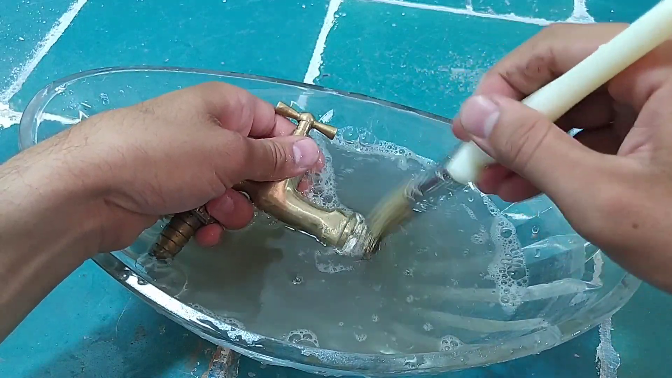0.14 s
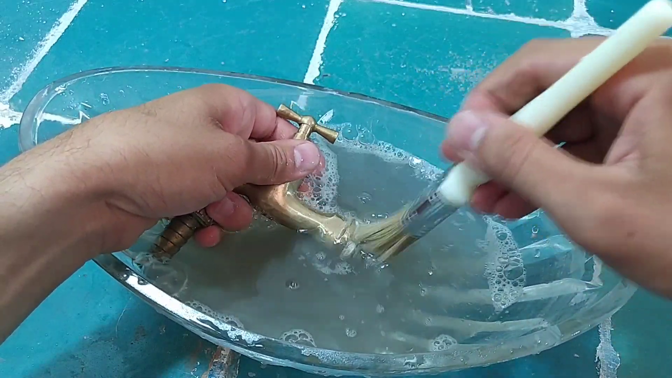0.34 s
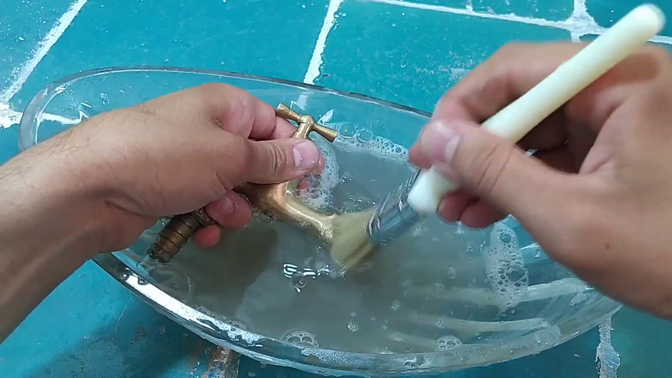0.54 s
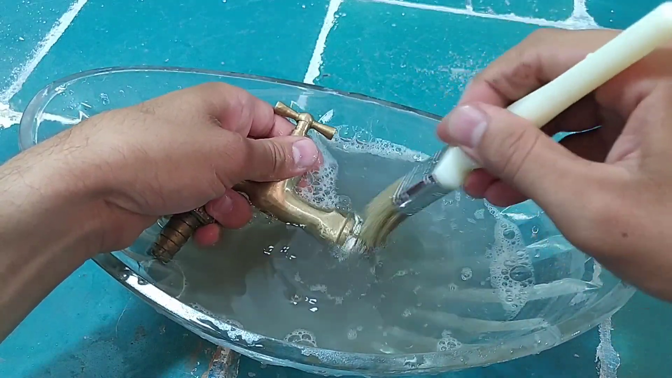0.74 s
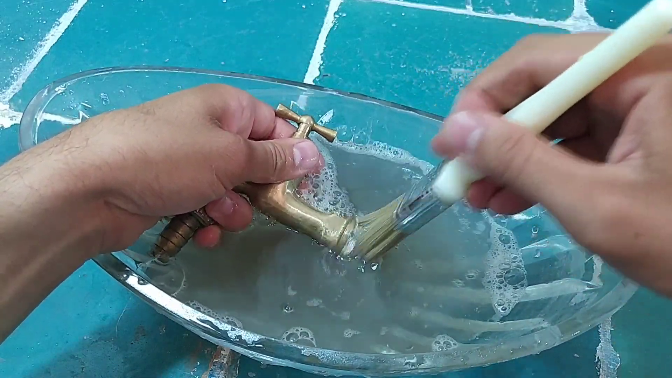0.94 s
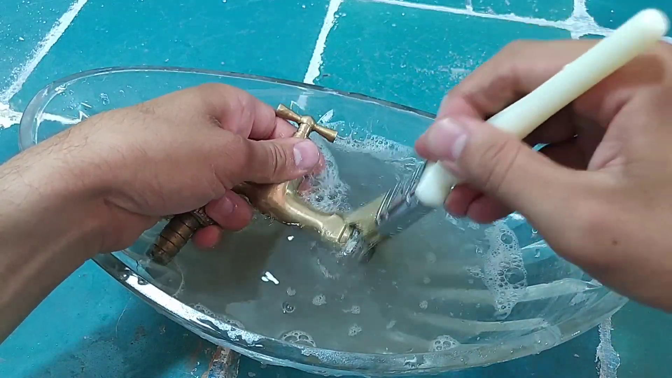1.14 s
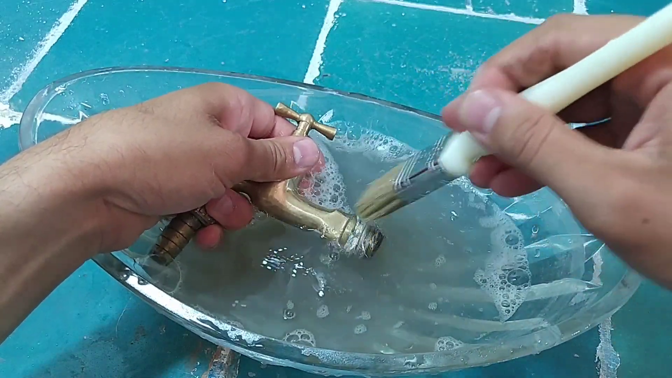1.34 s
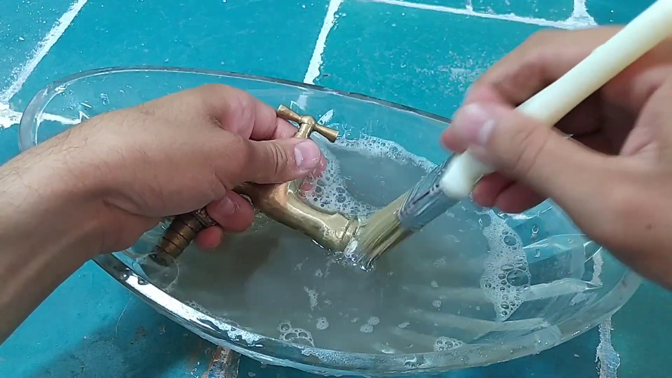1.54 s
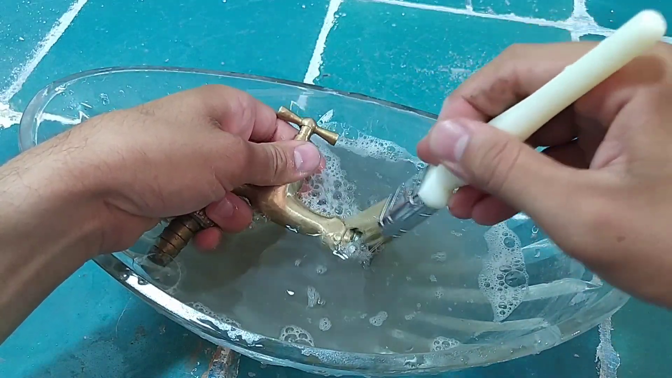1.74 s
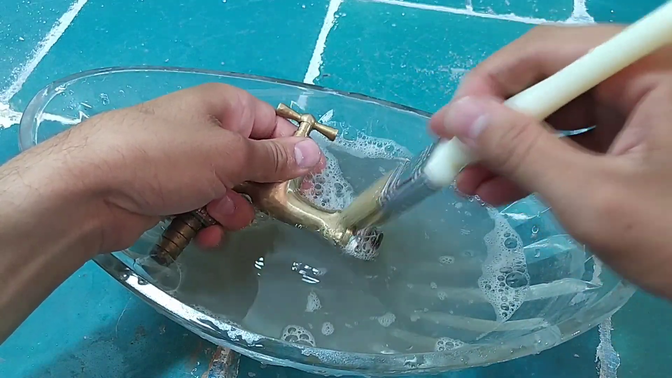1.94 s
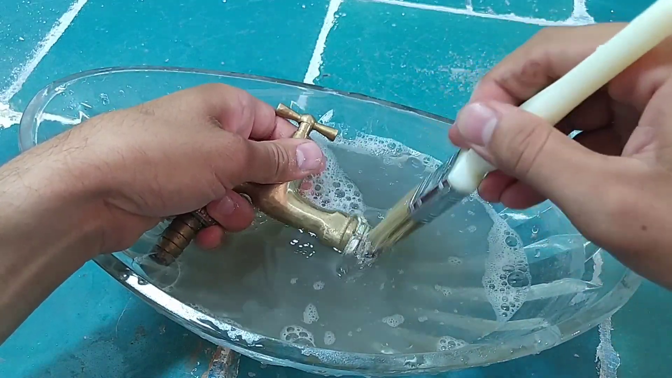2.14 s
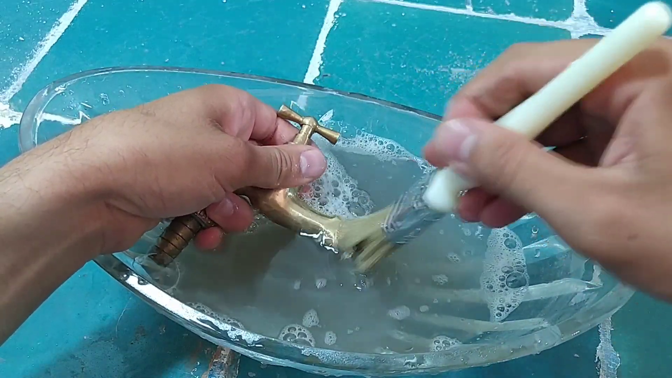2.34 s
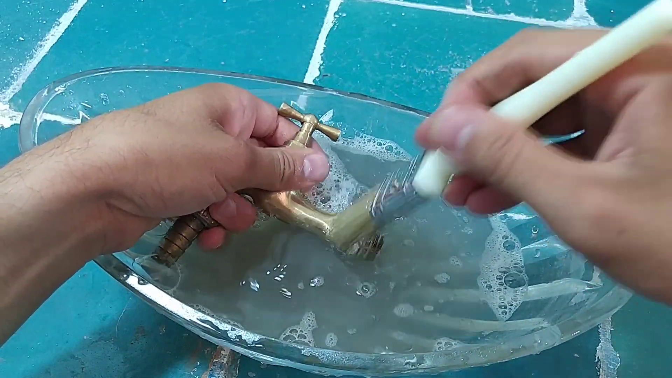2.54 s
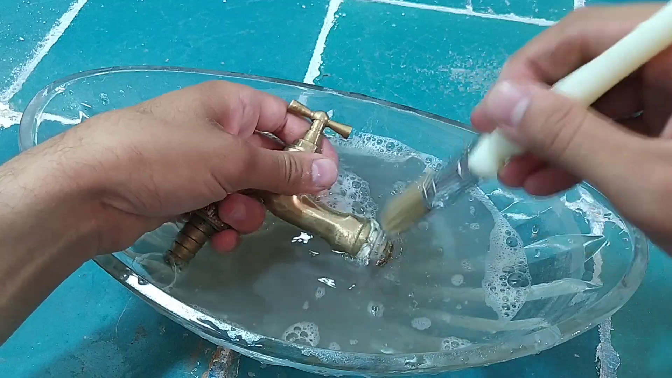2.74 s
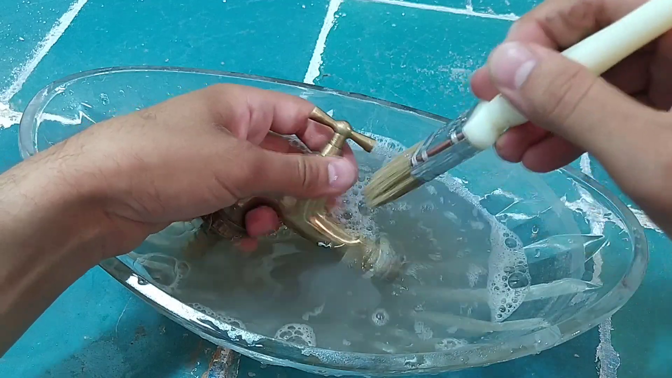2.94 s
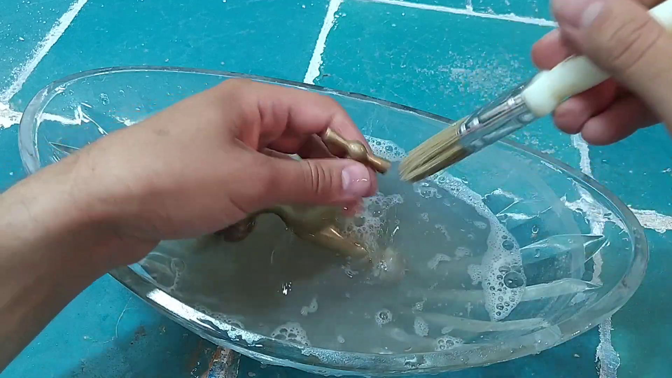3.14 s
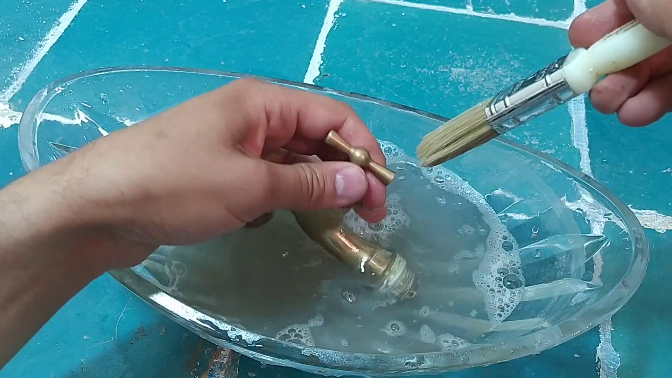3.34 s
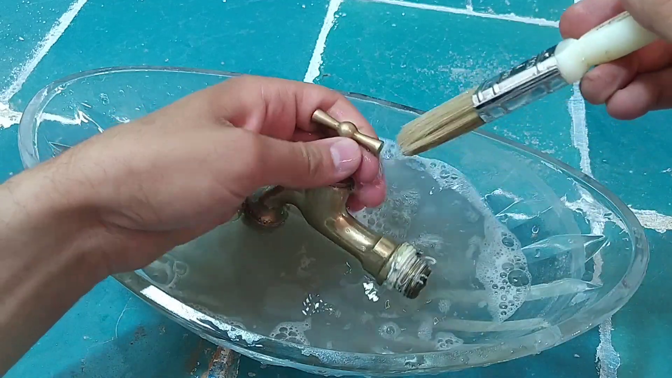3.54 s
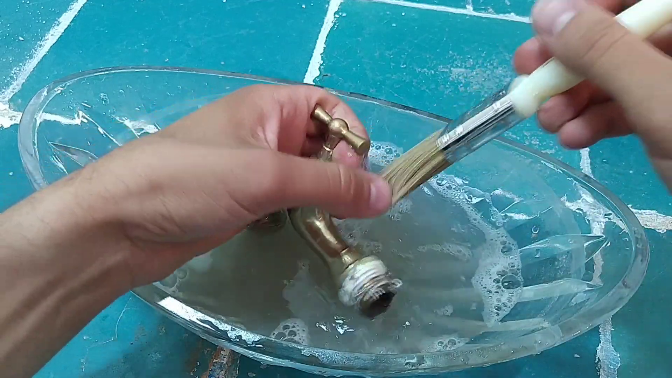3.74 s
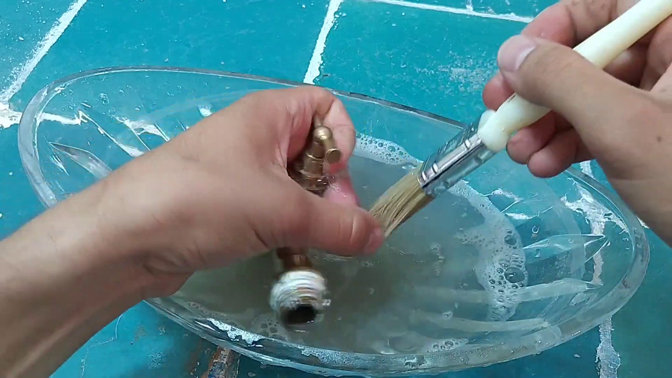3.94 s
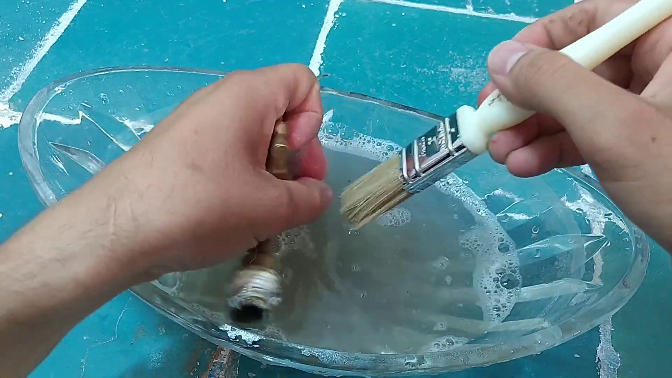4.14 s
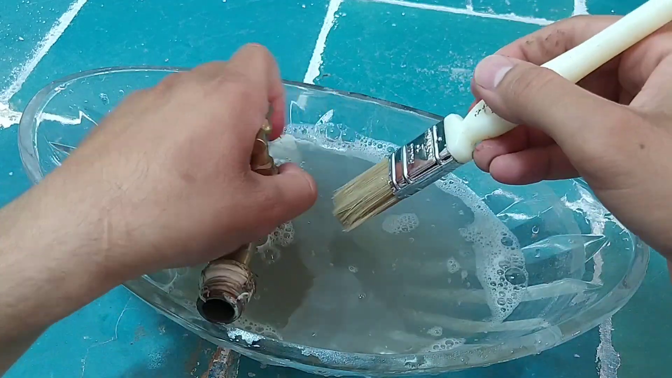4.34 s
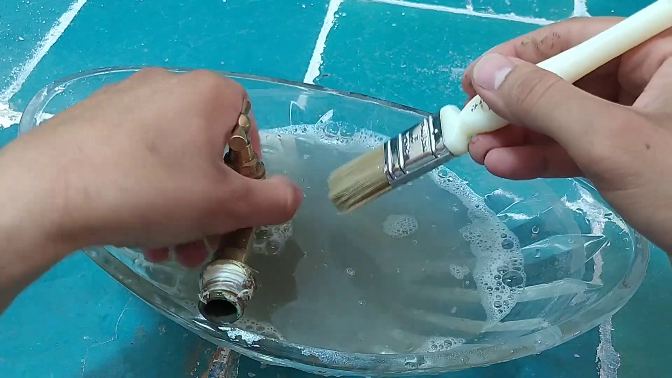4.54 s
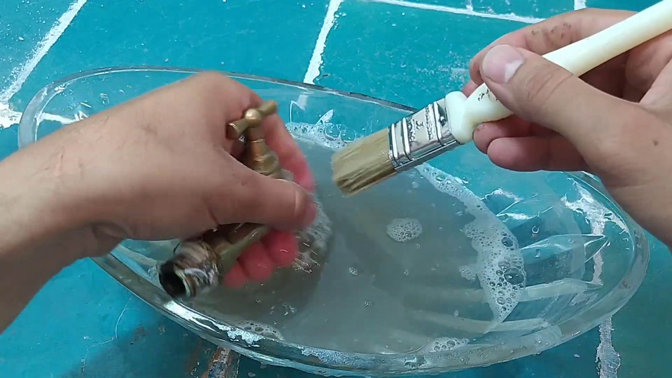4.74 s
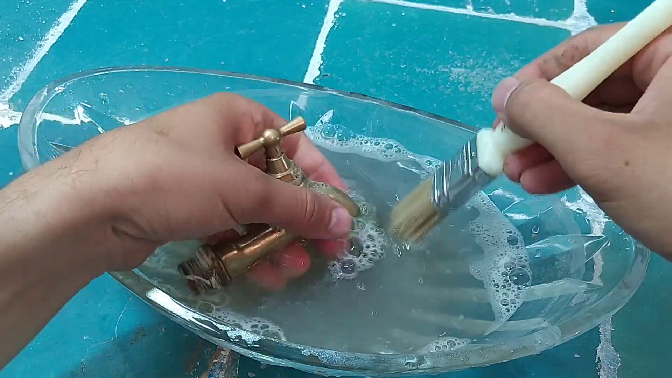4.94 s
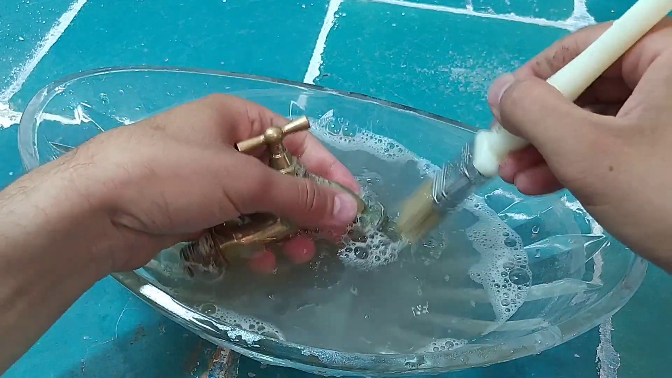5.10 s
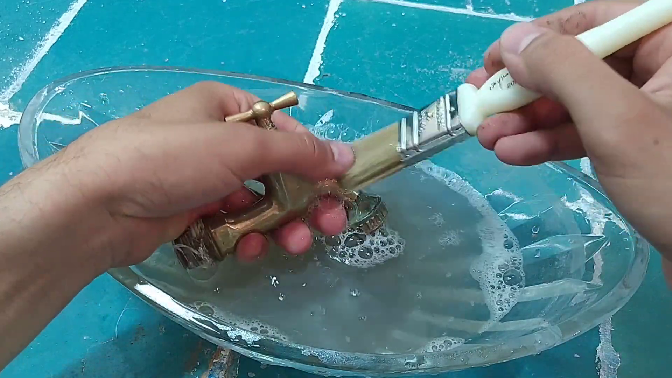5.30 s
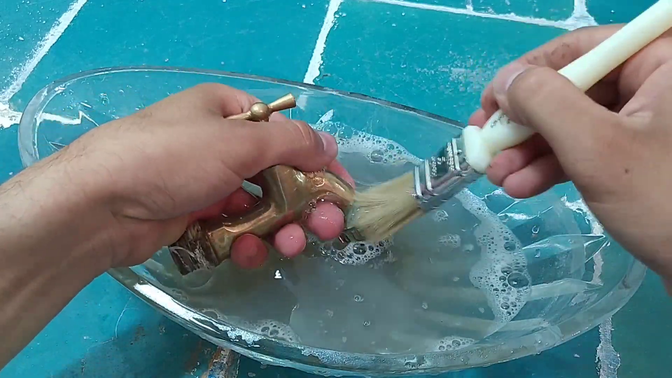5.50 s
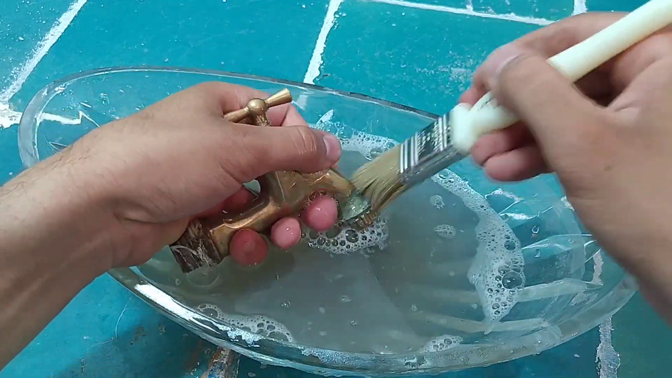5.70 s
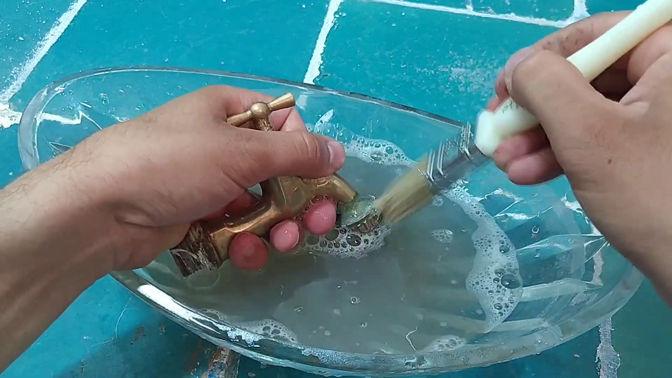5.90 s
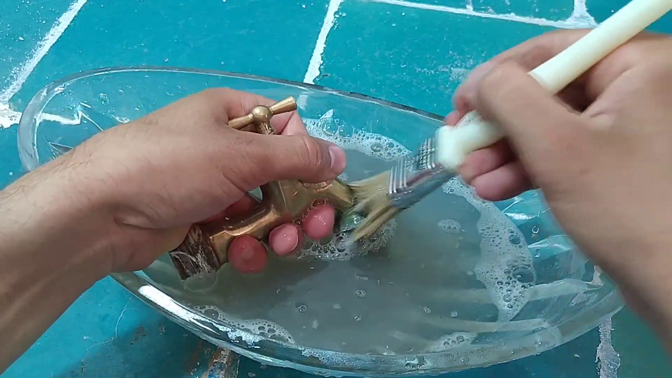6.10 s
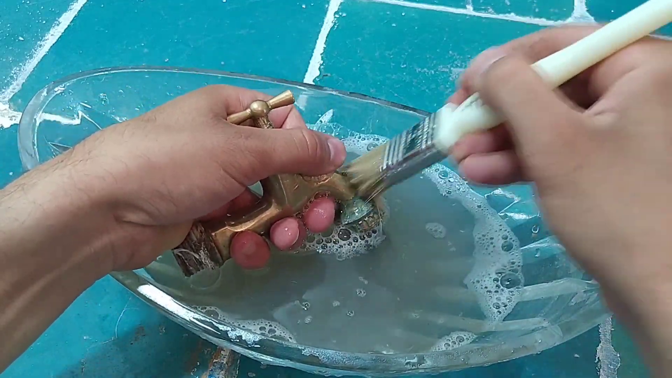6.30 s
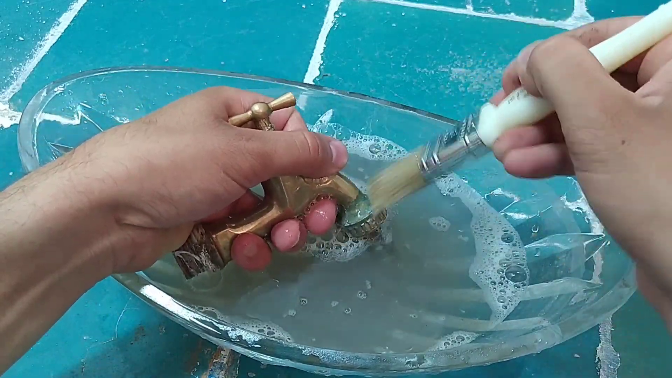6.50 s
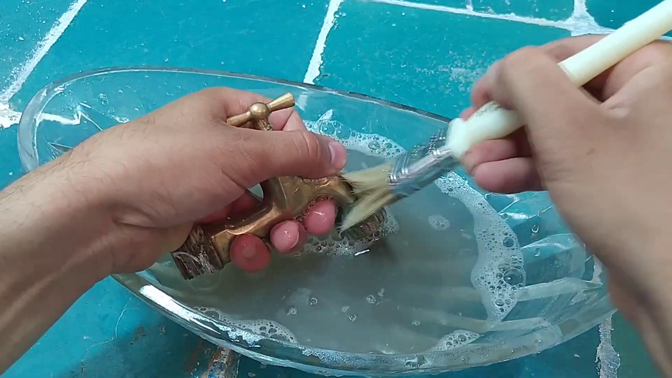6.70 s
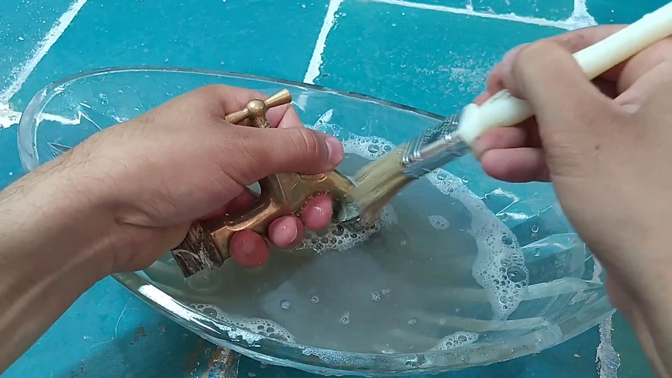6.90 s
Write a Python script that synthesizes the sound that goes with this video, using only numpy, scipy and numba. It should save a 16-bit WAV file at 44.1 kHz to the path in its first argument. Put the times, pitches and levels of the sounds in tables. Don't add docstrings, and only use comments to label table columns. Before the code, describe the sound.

A wet bristle brush scrubs a brass tap in short fizzing strokes, then the tap clinks and scrapes on a glass bowl before brushing resumes.

```python
import sys
import numpy as np
from scipy import signal
from scipy.fft import rfft, irfft, dct, next_fast_len
from scipy.io import wavfile
from scipy.ndimage import uniform_filter1d
from numba import njit

SR = 44100
rng = np.random.default_rng(int(sys.argv[2]) if len(sys.argv) > 2 else 0)


def wrap_up_sound(samples):
    columns = np.atleast_2d(samples).T
    tamed = np.clip(columns, -1, 1)
    steps = np.round(tamed * 32767).astype(np.int16)
    wavfile.write(sys.argv[1], SR, steps)


def linear_from_db(decibels):
    return 10 ** (np.asarray(decibels, float) / 20)


N = 311346
T = np.arange(N) / SR


def evened(x):
    return x / np.sqrt(np.mean(x ** 2) + 1e-20)


def read(points, hz):
    f, value = np.transpose(points)
    return np.interp(np.log(hz + 1), np.log(f + 1), value)


def bands(x, peaks):
    size = next_fast_len(N)
    hz = np.fft.rfftfreq(size, 1 / SR)
    shape = sum(linear_from_db(db) / (1 + ((hz - f) / (width / 2)) ** 2) for f, width, db in peaks)
    return irfft(rfft(x, size) * shape, size)[..., :N]


def swells(rows, power=1):
    t = T[::32]
    gain = np.zeros(len(t))
    for s, db, rise, fall in rows:
        away = np.maximum((s - t) / max(rise, .003), (t - s) / max(fall, .003))
        gain += linear_from_db(db - 20 * away ** power)
    return np.interp(T, t, gain)


def stutter(depth_db, s):
    flicker = evened(uniform_filter1d(rng.standard_normal(N), size=round(s * SR)))
    return evened(linear_from_db(depth_db * flicker))


def grains(per_s, spread_db, shared, lag_count):
    size = linear_from_db(spread_db * np.minimum(rng.exponential(1, (3, N)), 4)) * rng.standard_normal((3, N))
    a, b, both = size * (rng.random((3, N)) < per_s / SR)
    shared = np.clip(shared, 0, 1)
    return np.sqrt(1 - shared) * np.array([a, b]) + np.sqrt(shared) * np.array([np.roll(both, lag_count), both])


def blows(rows, column):
    train = np.zeros(N)
    for row in rows:
        train[round(row[0] * SR)] += linear_from_db(row[column])
    return train


def rattle(train, s, clean=0.58):
    fade = np.exp(-1 / (s * SR))
    burst = signal.lfilter([np.sqrt(1 - fade ** 2)], [1, -fade], train + 1e-30) * rng.standard_normal(N)
    return clean * train + np.sqrt(1 - min(clean, 1) ** 2) * burst


# start in seconds, end in seconds,
# contact from 0 to 1 at the start, contact at the end.
LIFTS = [
    (3.03, 3.3, .15, 0.12),
    (3.371, 3.744, 0.16, 0.38),
    (4.194, 4.356, 0.09, 0.4),
    (4.554, 4.686, 0.48, 0.93),
    (4.902, 5.321, 0.51, 0.11),
]


def resting():
    rest, lift_s, settle_s = .88, 0.012, 0.037
    points = []
    for s, end, a, b in LIFTS:
        points += [(s - lift_s, rest), (s, a), (end, b), (end + settle_s, rest)]
    return np.clip(np.interp(T, *np.transpose(points)), 0, 1)


# start in seconds, level change in dB (only losses count).
CHOKES = [
    (3.095, -7.5),
    (3.18, -15),
    (4.302, 3),
    (4.327, -9.5),
    (4.3608, -4),
    (4.904, -1),
    (5.028, -5),
]


def choking():
    loss_db = np.zeros(N)
    for s, db in CHOKES:
        loss_db[round(s * SR)] += min(db, 0)
    return linear_from_db(uniform_filter1d(loss_db, size=88))


@njit
def swing(drive, free, stiffer, lossier, contact, kept):
    out, state, step, last = np.zeros(len(drive), np.complex128), 0j, 0j, -1.
    for i in range(len(drive)):
        if contact[i] != last:
            step, last = np.exp(free + (stiffer - lossier * contact[i]) * contact[i]), contact[i]
        state = state * step * kept[i] + drive[i]
        out[i] = state
    return out


def ring(drive, modes, stiffen=0, rise_cycles=1.3):
    contact, kept, out = resting(), choking(), np.zeros((2, N))
    for hz, db, t60, damping, pan_db, lead in modes:
        loss, turn = np.log(1000) / max(t60, .002) / SR, 2j * np.pi * hz / SR
        ports = np.array([linear_from_db(pan_db / 2) * np.exp(1j * lead), linear_from_db(-pan_db / 2)])
        ports /= max(abs(ports.mean()), .35)
        slow = np.exp(-hz / SR / rise_cycles)
        soft = signal.lfilter([1 - slow], [1, -slow * np.exp(turn)], drive + 1e-30)
        mode = swing(soft, turn - loss, turn * stiffen, loss * abs(damping), contact, kept)
        out += linear_from_db(db) * (ports[:, None] * mode).imag
    return out


# frequency in Hz, level in dB per Hz.
AIR = [(12, -26.5), (20, 4), (59, -12), (122, -12.5), (500, -22), (2000, -35), (10200, -38.5), (15500, -47)]
# frequency in Hz, left-right correlation.
SAME = [(30, 0.24), (110, 0.77), (300, 0.32), (3000, 0.088), (15000, .05)]
# peak in seconds, level in dB.
SLOSH = [(.005, -50), (.15, -61), (.77, -58.5), (1.005, -57), (3.05, -56.5), (3.36, -53), (3.676, -51.5),
         (3.99, -56), (4.25, -55), (4.6, -62), (5.032, -53)]
# frequency in Hz, width in Hz, level in dB.
HUM = [
    (39.6, 4.8, -76),
    (101.5, 2.3, -72.5),
    (120.87, 3.6, -72.5),
]


def air():
    frames, hz = N // 512 + 5, np.fft.rfftfreq(2048, 1 / SR)
    a, b, c, d, patches = rng.standard_normal((frames, len(hz), 5)).T
    patches = evened(uniform_filter1d(uniform_filter1d(patches, size=20, axis=0), size=6, axis=1))
    same, left = np.clip(read(SAME, hz), -1, 1)[:, None], a + 1j * b
    z = np.array([left, same * left + np.sqrt(1 - same ** 2) * (c + 1j * d)])
    white = signal.istft(z * linear_from_db(1.5 * patches), nperseg=2048, noverlap=1536)[1][:, :N]
    size = next_fast_len(N)
    hiss = irfft(rfft(white, size) * linear_from_db(read(AIR, np.fft.rfftfreq(size, 1 / SR))), size)[:, :N]
    hiss_db = -62.5 + np.array([[-.7], [.7]])
    turned = white[:, ::-1]
    rise_s, fall_s, lapping_db = 0.083, 0.091, -76
    rocking = swells((s, db, rise_s, fall_s) for s, db in SLOSH) + linear_from_db(lapping_db)
    slosh = rocking * evened(bands(turned, [(208.2, 100, 1.0), (290.0, 200, -2.5)]))
    hum = sum(linear_from_db(db) * evened(bands(turned, [(f, width, 0)])) for f, width, db in HUM)
    return linear_from_db(hiss_db) * evened(hiss) + slosh + hum


# frequency in Hz, time to fall 60 dB in seconds.
ROOM_T60 = [(200, 0.28), (1000, 0.31), (4000, 0.41), (10000, 0.072)]


def room(x):
    taps = np.zeros((2, SR // 2))
    at = np.arange(160, SR // 2 - 20, 20) + rng.integers(0, 20, (2, (SR // 2 - 161) // 20))
    np.put_along_axis(taps, at, rng.choice([-1., 1.], at.shape), 1)
    hz, t, (left, other) = signal.stft(taps, SR, nperseg=256)
    same = 1 / (1 + (hz[:, None] / 700) ** 2)
    z = np.array([left, same * left + np.sqrt(1 - same ** 2) * other])
    tail = signal.istft(z * linear_from_db(-60 * t / read(ROOM_T60, hz)[:, None]), SR, nperseg=256)[1]
    return signal.fftconvolve(x.mean(0)[None], tail / np.linalg.norm(tail[0]), axes=1)[:, :N]


# time in seconds, pitch in Hz, level in dB.
SQUEAK = [
    [(2.85, 3350, -84), (2.9, 3720, -75), (2.96, 3980, -73), (3.02, 3750, -77)],
    [(3.2, 3500, -83), (3.25, 4000, -72), (3.34, 3450, -78)],
]


def squeak():
    out = np.zeros(N)
    for rows in SQUEAK:
        s, pitch_hz, db = np.transpose(rows)
        hz = np.interp(T, s, pitch_hz)
        gain = linear_from_db(np.interp(T, s, db, -160, -160))
        wobble = 1 + 0.25 * evened(uniform_filter1d(rng.standard_normal(N), size=300))
        out += gain * np.sqrt(2) * wobble * np.sin(2 * np.pi * np.cumsum(hz) / SR)
    return out


# start in seconds, peak level in dB, pitch in Hz.
BUMPS = [(.193, -48.5, 370), (0.2452, -49.5, 914), (0.267, -56, 937), (.346, -62.5, 1426),
         (0.718, -72, 930), (0.83, -53, 947), (1.243, -59.5, 1550), (1.35, -49.5, 917), (2.521, -58.5, 900),
         (2.763, -56.5, 870), (2.79, -55.5, 906), (5.783, -60, 940), (5.948, -49.5, 874), (5.986, -50, 690),
         (6.029, -57.5, 518), (6.233, -50.5, 653), (6.242, -45, 460), (6.269, -57, 930), (6.346, -53, 780),
         (6.442, -63.5, 846), (6.535, -46, 428), (6.567, -51.5, 570), (6.672, -44.5, 546),
         (6.694, -55.5, 907), (6.817, -60, 825), (6.898, -53, 916), (6.917, -57, 843), (6.972, -50, 830),
         (7.012, -62, 815), (7.03, -49, 950)]
# frequency in Hz, level in dB,
# time to fall 60 dB in seconds, extra damping on contact, left-right level in dB, left lead in radians.
THUD = [(300, -11, 0.087, 0.0043, -1.5, 1.6), (457, 2, 0.017, 0.0058, -2, .4),
        (545, -8.5, .12, .005, -6.5, 0.042), (667, 2.5, 0.017, 0.013, -1.5, -0.29),
        (775, -2, .02, 0.0081, -9, 0.83), (849, 3, 0.02, 0.01, -7.5, -3.8),
        (956, -4.5, 0.044, 0.0058, 13, -2.6), (1123, -3.5, 0.025, 0.0092, -2, 1.2)]
CLICK = [(1536, 2.5, 0.0074, 0.00067, -7.5, -7), (1687, -3, 0.012, 0.0083, -4.5, -1.5),
         (1810, -11, 0.033, 0.04, 12, 0), (2400, -9.5, 0.031, 0.0037, -5.5, -2.5),
         (2697, -7, 0.016, 0.013, 5.5, 1)]
GRIP = [(3400, 2, .025, 0, -2, .5), (4400, -2, .015, 0, -2, 1.2)]


def bumps():
    out, t = np.zeros((2, N + 4000)), np.arange(4000) / SR
    sag = 1 + 0.98 * np.exp(-t / 0.00255)
    pan_db = np.array([[-0.25], [0.25]])
    squelch = evened(uniform_filter1d(rng.standard_normal((len(BUMPS), len(t))), size=12, axis=1))
    for (s, peak_db, hz), wet in zip(BUMPS, squelch):
        tone = np.sin(2 * np.pi * hz * np.cumsum(sag) / SR) + 0.41 * wet
        tone *= linear_from_db(peak_db - 60 * t / 0.044) * (1 - np.exp(-t / 0.0013))
        out[:, round(s * SR):][:, :len(t)] += linear_from_db(pan_db) * tone
    taps = rattle(blows(BUMPS, 1), 0.014, clean=0.32)
    return out[:, :N] + linear_from_db(-6.5) * ring(taps, THUD) + linear_from_db(-9.5) * ring(taps, CLICK + GRIP)


# peak in seconds, fizz
# level in dB, time to rise 20 dB in seconds (never quicker than 0.04).
STROKES = [(.005, -60, 0.1), (.19, -77, -0.5), (0.271, -57.5, 0.18), (0.522, -54.5, 0.12), (.72, -56, 0.09),
           (.822, -54.5, 0.04), (0.851, -52.5, 0.05), (.98, -58, 0.13), (1.156, -58.5, 0.1),
           (1.368, -54.5, 0.1), (1.662, -57, 0.17), (1.972, -57, 0.13), (2.172, -57.5, .11),
           (2.277, -55.5, -0.01), (2.41, -62, 0.27), (2.524, -55, 0.09), (2.789, -57.5, 0.16),
           (2.95, -71, 1), (5.395, -59, 0.07), (5.587, -61.5, 0.02), (5.63, -62, -0.13),
           (5.691, -58.5, 0.18), (5.766, -61, 0.11), (5.986, -62, 0.1), (6.022, -57.5, 0.08),
           (6.244, -60, 0.09), (6.29, -57, 0.13), (6.34, -56, -0.01), (6.432, -56.5, 0.02),
           (6.565, -63.5, 0.02), (6.615, -56, 0.11), (6.721, -56, 0.02), (6.87, -59.5, 0.27),
           (6.917, -55, 0.13), (7.012, -51.5, 0),
           (5.85, -62, .1),
    (5.9, -60.5, .08),
    (6.09, -66, .25),
    (6.17, -65, .25),
    (6.39, -63, .1),
    (6.5, -70, .15),
]
# frequency in Hz, width in Hz, level in dB.
BRISTLE = [(8560, 3180, -3.5), (9490, 770, -9), (12500, 3700, -31.5), (14000, 1100, -18.5)]
RASP = [(1585, 11000, -1), (3920, 780, -4), (4270, 2700, -0.5), (5640, 1200, -2.5)]
# start in seconds, peak level in dB.
SNAPS = [(.2586, -42.5), (.8185, -44), (1.242, -51.5), (2.646, -45), (3.05, -40.5), (3.079, -36),
         (3.0975, -48), (3.1256, -43.5), (5.985, -52.5), (6.239, -40.5), (6.6715, -42.5), (6.9027, -50)]
# frequency in Hz, level in dB, time to fall 60 dB in seconds,
# extra damping on contact, left-right level in dB, left lead in radians.
TICK = [(8550, 10.5, 0.008, 0.0026, -4.5, 1.3), (8840, 5.5, 0.022, 0.00055, -3.5, 1.4),
        (9800, -5, 0.018, 0.00036, -0.5, 0.7), (11400, -12.5, 0.0065, 0.0074, -0.6, .3)]


def brush():
    flicks = grains(9000, 2.1, 0.12, lag_count=14)
    fizz, rasp = evened(bands(flicks, BRISTLE)), evened(bands(flicks, RASP))
    quickest_s, fall_share, roundness = .04, 0.77, 1.26
    strokes = []
    for s, db, rise in STROKES:
        rise = max(rise, quickest_s)
        strokes.append((s, db, rise, rise * fall_share))
    press = swells(strokes, roundness) * stutter(2.0, 0.0085)
    wet = linear_from_db(-72 + .5 * T) * (press * 10 ** 3) ** .7
    snaps = blows(SNAPS, 1)
    splash = linear_from_db(11.0) * bands(rattle(snaps, 0.02, clean=0), RASP)
    return press * fizz + wet * rasp + splash + linear_from_db(-11) * ring(snaps, TICK, rise_cycles=1.6)


# peak in seconds, grit level in dB,
# rise in seconds, fall in seconds.
SLIDES = [(3.06, -50.5, .03, 0.21), (3.21, -69, 0.022, 0.27), (3.52, -54, 0.16, 0.087),
          (3.67, -56, 0.13, .12), (3.805, -56, 0.013, 0.031), (3.985, -49, 0.038, 0.11),
          (4.21, -47, .02, 0.11), (4.372, -51, 0.23, 0.16), (4.585, -64, 0.057, 0.074),
          (4.795, -52, 0.041, 0.11), (5.02, -57, 0.032, 0.18)]
# peak in seconds, rumble level in dB,
# rise in seconds, fall in seconds, grind relative to the rumble in dB.
SCRAPES = [(2.97, -73.5, 0.42, 0.24, 7.5), (3.046, -51.5, 0.01, 0.025, 5.5), (3.1, -62.5, 0.071, 0.63, 1.5),
           (3.375, -49, 0.0091, 0.14, -4.5), (3.5, -68.5, 0.08, 0.28, -2), (3.67, -61.5, 0.092, 0.073, 1.5),
           (3.99, -60.5, 0.053, 0.2, -1), (4.21, -42.5, 0.012, 0.08, 1.5), (4.371, -36, 0.053, 0.078, -2.5),
           (4.51, -68.5, 0.056, 0.19, -1.5), (4.82, -35, 0.054, 0.15, -20), (4.93, -44.5, 0.06, 0.055, -15),
           (5.026, -55.5, 0.014, 0.093, 8)]
# frequency in Hz, width in Hz, level in dB.
GRIT = [(7780, 910, -6), (8610, 500, -2), (9410, 530, -4.5), (11500, 1300, -20)]
GRIND = [(2630, 610, 0), (3352, 190, 6.5), (4140, 520, 1), (4920, 440, -2.5), (5440, 790, -5),
         (6000, 500, -5)]


def drag():
    grit = evened(grains(4400, 2.9, 0.15, lag_count=5.7))
    hiss = swells(SLIDES) * stutter(1.2, 0.0068)
    rumble = swells(row[:4] for row in SCRAPES)
    grind = swells((s, db + grind_db, rise, fall) for s, db, rise, fall, grind_db in SCRAPES)
    scrape = hiss * evened(bands(grit, GRIT)) + grind * evened(bands(grit, GRIND))
    return grit, rumble, scrape


# start in seconds, click peak in dB, thud in dB,
# tick in dB, high glass modes in dB.
KNOCKS = [(3.0339, -34.5, -43.5, -27, -41.5), (3.3546, -31.5, -26.5, -37.5, -37),
          (3.6134, -70.5, -41, -67, -79), (3.9755, -38, -33, -26, -41.5), (4.1638, -65, -67, -42, -65.5),
          (4.193, -12, -23, -30.5, -32), (4.3045, -23.5, -36, -46, -40.5), (4.3276, -18.5, -31, -45, -40),
          (4.362, -13.5, -30.5, -43, -26), (4.5784, -46, -45, -50, -61), (4.739, -53.5, -55.5, -73, -78),
          (4.812, -47, -42, -60, -67), (4.907, -30, -25, -46.5, -47), (5.0317, -31, -24, -37.5, -46)]
# frequency in Hz, level in dB,
# time to fall 60 dB in seconds, extra damping on contact, left-right level in dB, left lead in radians.
UPPER = [(3580, -6, .09, 0.1, 2, 2.5), (4188, -13, .05, 0.1, 3, .3), (4730, -10, .04, 0.1, 4, 1.5),
         (4802, -8, .13, 0.1, -4, .3), (5600, -9, .03, 0.1, 0.5, 2.2), (6320, -2, .05, 0.1, 0.5, 1.2),
         (7800, -4, .06, 0.1, -2, .6), (8640, -12, .12, .1, -3, 1.2), (9566, -7, .07, .1, -3, .8),
         (2745, -7, .06, .1, -2, .8)]
THUMP = [(115, 3, 0.086, 0.0033, -1, .1), (190, -5, 0.12, 0.0016, -1, 0.085)]


def body(grit, rumble):
    click_blows, thud_blows, tick_blows, upper_blows = [blows(KNOCKS, c) for c in (1, 2, 3, 4)]
    shake = rumble * grit
    upper = ring(linear_from_db(-2.0) * rattle(upper_blows, 0.00046) + linear_from_db(-52.5) * shake[1], UPPER)
    thud_drive = linear_from_db(-3.0) * rattle(thud_blows, 0.0036, clean=.45) + linear_from_db(-31.5) * shake[0]
    thud = ring(thud_drive, THUD, rise_cycles=0.34)
    click_drive = linear_from_db(-2.0) * rattle(click_blows, 0.0023, clean=0.41) + linear_from_db(-31.5) * shake[1]
    click = ring(click_drive, CLICK, rise_cycles=.7)
    thump = ring(linear_from_db(-28.5) * (click_blows + thud_blows), THUMP, rise_cycles=0.35)
    tick = ring(linear_from_db(-10.5) * rattle(tick_blows, 0.0026), TICK, rise_cycles=1.9)
    return upper + thump + thud + click + tick


# start in seconds, then its four lowest modes in dB.
CLINKS = [(3.034, -64, -50, -44.5, -44.5), (3.3546, -52, -23.5, -62.5, -42.5),
          (3.6134, -60, -46.5, -78, -73), (3.9767, -53.5, -50.5, -51, -57.5),
          (4.1936, -27.5, -35.5, -16.5, -32.5), (4.3046, -33, -31.5, -23.5, -47.5),
          (4.328, -40.5, -31.5, -30, -37), (4.362, -31, -21.5, -24, -27), (4.3754, -32, -30, -15.5, -38),
          (4.815, -48.5, -29.5, -42.5, -70.5), (4.9061, -33.5, -17.5, -32, -45.5),
          (5.031, -42.5, -51, -45, -48.5)]
# frequency in Hz, level in dB,
# time to fall 60 dB in seconds, extra damping on contact, left-right level in dB, left lead in radians.
RIM = [
    [(547, 0.5, 0.61, 3, -12.5, 2)],
    [(1294.4, -4.5, 0.51, 1.5, 1.5, -1.2)],
    [(2268, 2, 0.36, 0.25, -6, 1), (2254, -18, 0.3, 0.25, 12, -2.2)],
    [(3338, 3, 0.13, .3, 3.5, 0.65), (3297, -2, 0.12, .3, 7, 0.26)],
]
STIFFEN = [0.028, 0.035, 0.0064, 0.0061]
CROSS = [(1280, 0.5, .7, 1.5, -1.5, 3.07)]
# start in seconds, level in dB.
CROSS_BLOWS = [
    (3.3546, -41),
    (4.1936, -30.5),
    (4.362, -35.5),
    (4.9061, -42),
    (5.031, -44.5),
]
LOOSE = [(1287, -1.5, .45, 2.5, 2.5, -1.1), (1306, .5, .5, 2.5, -.5, -1.3)]
# start in seconds, level in dB.
LOOSE_BLOWS = [
    (5.031, -40),
]


def glass(grit, rumble):
    out = ring(blows(CROSS_BLOWS, 1) + linear_from_db(-40) * rumble * grit[1], CROSS, STIFFEN[1])
    out += ring(blows(LOOSE_BLOWS, 1), LOOSE)
    shake_db = [-42, -34, -43.0, -50]
    for column, db, group, stiffen in zip([1, 2, 3, 4], shake_db, RIM, STIFFEN):
        out += ring(linear_from_db(-1.0) * blows(CLINKS, column) + linear_from_db(db) * rumble * grit[0], group, stiffen)
    return out


def scene():
    grit, rumble, scrape = drag()
    ringing, close = glass(grit, rumble), brush()
    near = body(grit, rumble) + scrape + bumps() + squeak()
    near = signal.sosfilt(signal.butter(2, 85, "highpass", fs=SR, output="sos"), near)
    tail = room(linear_from_db(-7.0) * near + linear_from_db(-10.5) * close + linear_from_db(-14) * ringing)
    return near + ringing + close + tail + air()


# frequency in Hz, level in dB over the typical local level.
GATE = [(300, -37), (1900, -11), (3000, 1), (6700, 0.5), (8300, -26), (9600, -8), (14000, 7.5), (15000, 23)]


def gate(x):
    hop, shift = 1024, 2048 - 227
    pair = np.pad([x[0] + x[1], x[0] - x[1]], ((0, 0), (shift, 3 * hop))) / 2
    count, window = N // hop + 3, signal.windows.cosine(2 * hop)
    at = hop * np.arange(count)[:, None] + np.arange(2 * hop)
    a, b, c, d = np.split(pair[:, at] * window, 4, axis=2)
    lines = dct(np.dstack([-c[..., ::-1] - d, a - b[..., ::-1]]), type=4, norm="ortho")
    hz, line_db = (np.arange(hop) + .5) * SR / 2 / hop, 10 * np.log10(lines ** 2 + 1e-20)
    local_db = uniform_filter1d(uniform_filter1d(line_db, size=61, axis=2), size=3, axis=1)
    mood = evened(uniform_filter1d(rng.standard_normal((2, count, 64)), size=4, axis=1))
    bar_db = local_db + read(GATE, hz) + 11.5 * np.repeat(mood, 16, axis=2)
    top_bar_db = line_db.max(axis=2, keepdims=True) - 61.5
    energy = (lines[..., 60:] ** 2).sum(axis=(0, 2))
    attack = energy > 6 * np.roll(energy, 2)
    lines *= ((line_db > bar_db) | attack[:, None]) & ((line_db > top_bar_db) | (hz < 10200))
    late, early = np.split(dct(lines, type=4, norm="ortho"), 2, axis=2)
    frames = np.dstack([early, -early[..., ::-1], -late[..., ::-1], -late]) * window
    first = frames[:, :1, :hop].reshape(2, 1, -1)
    joined = (frames[:, 1:, :hop] + frames[:, :-1, hop:]).reshape(2, 1, -1)
    mid, side = np.dstack([first, joined])[:, 0, shift:shift + N]
    return np.array([mid + side, mid - side])


def roll_off(x):
    return signal.sosfilt(signal.butter(12, 15770, fs=SR, output="sos"), x)


def record(dry):
    edge = signal.firwin(255, 15790, fs=SR)[None]
    mix = gate(signal.oaconvolve(dry, edge, "same", axes=1))
    return roll_off(mix)


dry = scene()
out = record(dry)
wrap_up_sound(out)
```